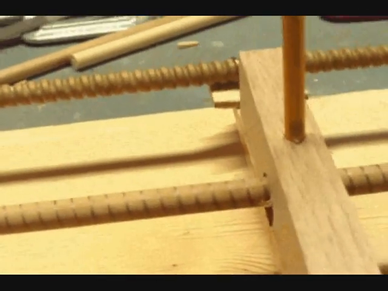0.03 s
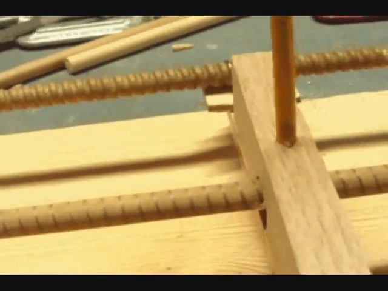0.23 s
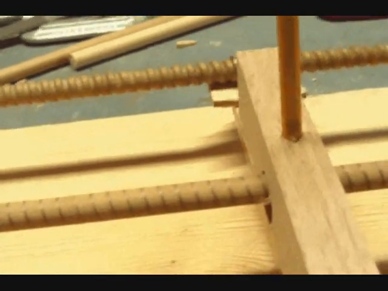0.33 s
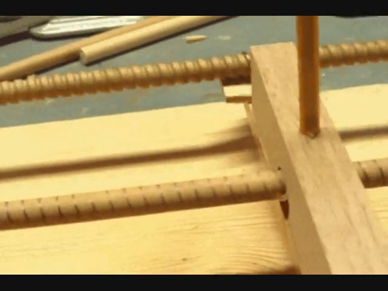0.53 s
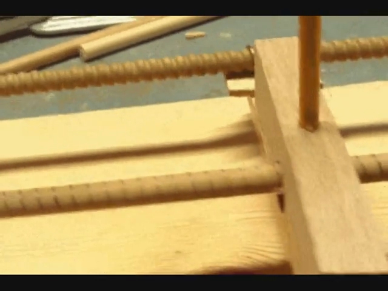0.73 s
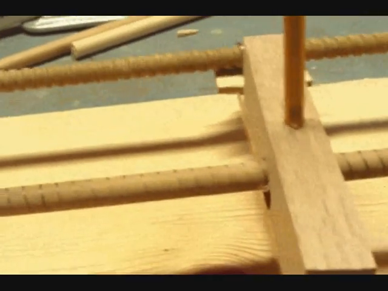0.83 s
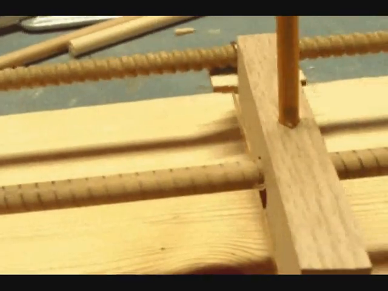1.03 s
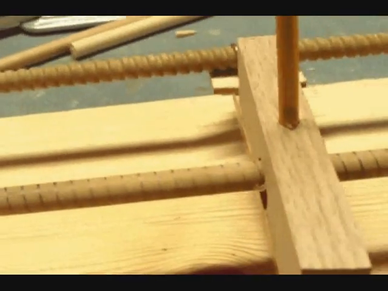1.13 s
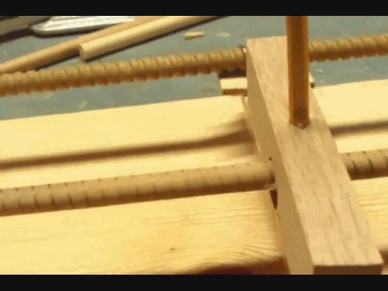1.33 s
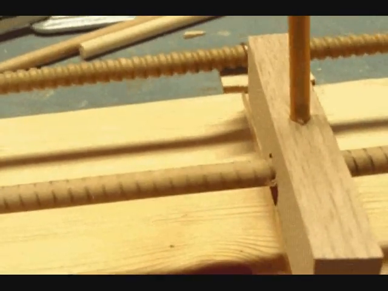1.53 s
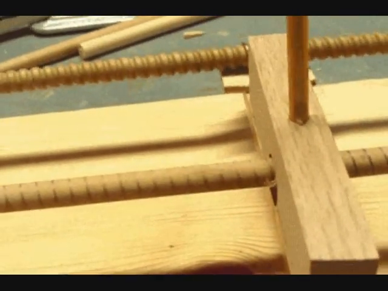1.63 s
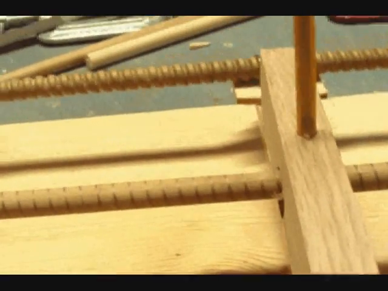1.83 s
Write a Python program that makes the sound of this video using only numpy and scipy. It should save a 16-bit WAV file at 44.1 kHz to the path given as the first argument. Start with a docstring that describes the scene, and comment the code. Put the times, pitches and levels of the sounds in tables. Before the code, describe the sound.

Dry, stuttering creaks come from a turning wooden screw, with rubbing and small thumps. After a short rest, a click starts a softer run of creaks. The room is small and quiet, with a low hum.

```python
"""A hand-cranked wooden lead screw drags a wooden carriage along its bed in a quiet workshop.
The dry thread sticks and slips: each slip is a short hollow judder that rings the frame, thumps the
bench and scrapes. Between slips the thread rubs. The crank rests for a moment, takes up its play
with a click and turns on more gently. Underneath: bench rumble, room air and a low hum."""
import sys
import numpy as np
from scipy import signal
from scipy.fft import rfft, irfft
from scipy.io import wavfile

SR = 44100
rng = np.random.default_rng(int(sys.argv[2]) if len(sys.argv) > 2 else 0)


def to_wav(s):
    """Save 16-bit WAV."""
    ch = np.atleast_2d(s).T  # columns
    pcm = np.round(np.clip(ch, -1, 1) * 32767)  # PCM
    wavfile.write(sys.argv[1], SR, pcm.astype(np.int16))


N = 83790
T = np.arange(N) / SR


def from_db(db):
    return 10 ** (np.asarray(db) / 20)


def unit_rms(x):
    return x / np.sqrt(np.mean(x ** 2) + 1e-20)


def level(points):
    """Gain over time from (s, dB) points."""
    return from_db(np.interp(T, *np.transpose(points)))


def coloured(x, spectrum):
    """Shape x by (Hz, dB) points; rms 1."""
    hz, db = np.transpose(spectrum)
    bins_hz = np.maximum(np.fft.rfftfreq(N, 1 / SR), 1)
    gain = from_db(np.interp(np.log(bins_hz), np.log(hz), db))
    return unit_rms(irfft(rfft(x) * gain, N))


def wobble(cutoff_hz):
    """Smooth random unsteadiness; rms 1."""
    lowpass = signal.butter(2, cutoff_hz, fs=SR, output="sos")
    return unit_rms(signal.sosfilt(lowpass, rng.standard_normal(N)))


def swell(attack_s, t60_s):
    """Quick rise, exponential decay."""
    t = T[:SR // 4]
    return (1 - np.exp(-t / attack_s)) * np.exp(-np.log(1000) * t / t60_s)


def strike(modes, attack_s):
    """One blow on (Hz, dB, t60 s) modes, each slightly varied in level and pitch."""
    spread_db, detune = 1.4, 0.012
    out = 0
    for hz, db, t60_s in modes:
        louder, higher = rng.standard_normal(2)
        envelope = from_db(db + spread_db * louder) * swell(attack_s, t60_s)
        out = out + envelope * np.sin(2 * np.pi * hz * (1 + detune * higher) * T[:len(envelope)])
    return out


def add(track, start_s, sound):
    i = int(np.clip(start_s * SR, 0, N - 1))
    track[i:i + len(sound)] += sound[:N - i]


def background():
    """Deep rumble of the rocking bench, room air and a low hum."""
    # Each row: time in seconds, level in dB.
    rumble_levels = [(0, -31), (.2, -46.5), (.34, -28), (.55, -46), (.76, -26.5), (.95, -37.5), (1.4, -39),
                     (1.5, -29.5), (1.62, -33.5), (1.9, -31.5)]
    # Each row: frequency in Hz, relative density in dB.
    rumble_spectrum = [(12, -6), (26, 0), (45, -4), (70, -10.5), (120, -7), (300, -56.5)]
    air_spectrum = [(20, -2), (60, -7.5), (125, -4), (180, -11), (270, -10), (450, -16.5), (1000, -20),
                    (2500, -25), (5000, -31.5), (6000, -41), (7000, -55)]
    # Each row: frequency in Hz, rms level in dB.
    hum_tones = [(54, -38), (119, -50)]
    air_db = -38
    rumble = level(rumble_levels) * coloured(rng.standard_normal(N), rumble_spectrum)
    hum = sum(from_db(db) * np.sqrt(2) * np.sin(2 * np.pi * (hz * T + rng.random()))
              for hz, db in hum_tones)
    air = from_db(air_db) * coloured(rng.standard_normal(N), air_spectrum)
    return rumble + hum + air


def fibre_grains():
    """Dense micro-slips of wood fibres, uneven in size."""
    rate_per_s, spread_db = 4000, 1.8
    sizes = from_db(spread_db * np.minimum(rng.exponential(1, N), 4))
    signs = rng.choice([-1, 1], N)
    return sizes * signs * (rng.random(N) < rate_per_s / SR)


def thread_rubbing():
    """The turning thread rubs unevenly in the carriage."""
    # Each row: time in seconds, level in dB.
    rub_levels = [(0, -48.5), (.18, -47.5), (.21, -26), (.265, -39), (.31, -28), (.345, -34.5), (.41, -41),
                  (.48, -27), (.565, -31), (.64, -25), (.715, -29), (.85, -31.5), (.92, -49.5), (1.35, -56),
                  (1.375, -35.5), (1.55, -32), (1.79, -34.5), (1.9, -34.5)]
    # Each row: frequency in Hz, relative density in dB.
    rub_spectrum = [(70, -7.5), (120, 0.5), (220, 5.5), (350, 5.5), (480, 3.5), (570, 5.5), (720, -2.5),
                    (1000, -7.5), (1400, -10), (1800, -13), (2600, -15.5), (3500, -19), (4500, -23.5),
                    (5800, -28.5), (7000, -52)]
    flutter_db = 1.5
    flutter = from_db(flutter_db * wobble(cutoff_hz=88))
    return level(rub_levels) * flutter * coloured(fibre_grains(), rub_spectrum)


def judder(hz, length_s):
    """The screw's vibration builds while it slides and is choked when it grips."""
    rise_s, grip_abruptness = 0.002, 2.1
    t = T[:SR // 10]
    build = 1 - np.exp(-(t / rise_s) ** 2)
    choke = np.exp(-(t / length_s) ** grip_abruptness)
    return build * choke * np.sin(2 * np.pi * hz * t)


def thread_slips():
    """Each slip judders, rings the frame, thumps the bench and scrapes briefly."""
    # Each row: start in seconds, judder level in dB, pitch in Hz, length in seconds,
    # thump level in dB, scrape level in dB.
    slips = [(0.051, -27, 664, 0.0057, -31.5, -46), (.195, -11, 590, 0.0039, -34, -46),
             (0.202, -31.5, 611, 0.0063, -29, -19.5), (0.2084, -5, 615, 0.0068, -11, -25),
             (0.217, -32.5, 573, 0.01, -41, -28.5), (0.227, -20.5, 577, 0.0077, -11, -29),
             (0.285, -24, 552, 0.012, -25.5, -31), (.301, -23, 630, .005, -27, -29),
             (.309, -20, 580, 0.0053, -15.5, -27), (0.362, -28, 568, 0.015, -17.5, -47),
             (.4185, -25, 502, 0.0029, -19, -31.5), (0.444, -15.5, 540, 0.026, -12, -18),
             (0.465, -8.5, 553, 0.012, -24.5, -16), (.478, -11.5, 582, 0.01, -14.5, -14.5),
             (.486, -4, 602, 0.0076, -12.5, -22), (.498, -6.5, 569, 0.0082, -11.5, -18),
             (.528, -9.5, 467, 0.0026, -18.5, -30), (.536, -12, 573, .021, -15, -45.5),
             (.5915, -1.5, 528, 0.0064, -39.5, -12.5), (.5995, -4.5, 607, 0.01, -29.5, -13),
             (.613, -12, 571, 0.0092, -32.5, -37), (.6345, -3, 515.5, 0.0079, -14.5, -22),
             (.6418, -0.5, 588, 0.01, -28.5, -10), (0.67, -23.5, 544, .010, -42, -26.5),
             (.686, -14.5, 544, 0.0058, -28, -18.5), (0.695, -12, 552, 0.014, -21, -28.5),
             (.733, -11.5, 554.7, 0.024, -12, -27), (.747, -13, 585, .009, -25, -18),
             (.761, -12, 560, 0.013, -26, -23.5), (0.777, -12, 518, 0.016, -12, -39),
             (0.804, -14.5, 584, 0.0044, -17, -41), (0.827, -12, 570, 0.012, -24.5, -19.5),
             (0.846, -15.5, 552, 0.014, -19, -32.5), (0.858, -36, 547, .010, -14.5, -24.5),
             (1.229, -43, 564, 0.0071, -32, -39), (1.352, -21.5, 507, 0.0068, -45, -31.5),
             (1.363, -18.5, 548, 0.017, -21, -31), (1.406, -23, 565, 0.0055, -36.5, -42),
             (1.431, -25, 547, 0.01, -36, -35), (1.46, -19.5, 540, 0.011, -45, -27.5),
             (1.493, -15, 513, 0.012, -17, -30.5), (1.559, -9, 584, 0.004, -17, -38),
             (1.591, -15.5, 547, 0.014, -30.5, -39), (1.611, -22.5, 546, 0.011, -33, -37.5),
             (1.662, -24.5, 613, 0.017, -37, -33), (1.682, -15.5, 484, 0.009, -33, -32),
             (1.721, -28, 534, 0.0032, -44, -27.5), (1.786, -22.5, 518, 0.0063, -28, -39),
             (1.825, -36, 645, .007, -23.5, -26.5), (1.839, -19, 533, 0.0062, -23, -29.5),
             (1.863, -23.5, 542, 0.012, -20, -35), (1.881, -22, 528, .007, -39, -29)]
    # Each row: frequency in Hz, dB re judder (frame) or thump (bench), t60 in seconds.
    frame_modes = [(317.6, -20.5, 0.019), (414, -7.5, 0.043), (580, -13.5, 0.076), (691, -15.5, 0.07),
                   (800, -17, 0.043), (953.4, -24, .05), (1003, -16.5, 0.053), (1261, -16.5, 0.051),
                   (1367, -19, 0.036)]
    bench_modes = [(61.4, -17.5, 0.23), (109, -5.5, 0.066), (136.3, 0, 0.046), (208, -2, 0.046),
                   (266.6, -8, .05)]
    # Each row: frequency in Hz, relative density in dB.
    scrape_spectrum = [(200, 7), (450, 9.5), (750, 2.5), (980, 5.5), (1130, -5.5), (1300, 1), (1750, -12.5),
                       (2300, -11), (2750, -16.5), (3400, -27), (4200, -16.5), (5500, -29), (7000, -61)]
    screw, body, scrape_power = np.zeros((3, N))
    for start_s, judder_db, hz, length_s, thump_db, scrape_db in slips:
        add(screw, start_s, from_db(judder_db) * judder(hz, length_s))
        add(body, start_s, from_db(judder_db) * strike(frame_modes, attack_s=0.00063))
        add(body, start_s, from_db(thump_db) * strike(bench_modes, attack_s=0.0028))
        add(scrape_power, start_s, (from_db(scrape_db) * swell(attack_s=0.0016, t60_s=0.098)) ** 2)
    roughness = 1 + 0.17 * wobble(cutoff_hz=200)
    scrape = np.sqrt(scrape_power) * coloured(fibre_grains(), scrape_spectrum)
    return screw * roughness + body + scrape


def bearing_clicks():
    """The screw takes up its play and taps its bearing: a dry crack and a brief ring."""
    # Each row: start in seconds, crack level in dB, ring level in dB.
    clicks = [(.1940, -21.5, -26.5), (.4195, -37.5, -34), (0.592, -27, -29), (0.6429, -16.5, -31),
              (1.3642, -23.5, -21), (1.3663, -29, -21.5), (1.46, -38, -47), (1.561, -41, -50),
              (1.725, -34, -48)]
    # Each row: frequency in Hz, relative level in dB, t60 in seconds.
    ring_modes = [(1780, -14.5, 0.02), (2420, -2, 0.031), (2327, -15, 0.2), (2630, -16, .1),
                  (3480, -6.5, 0.012), (4050, -17, 0.018), (4600, -19, 0.0077)]
    # Each row: frequency in Hz, relative density in dB.
    crack_spectrum = [(600, -4), (1300, 3), (1850, 3), (2500, -4.5), (3400, -7), (4250, -0.5), (4900, -9),
                      (6000, -9.5), (7000, -24.5)]
    ring, crack_envelope = np.zeros((2, N))
    for start_s, crack_db, ring_db in clicks:
        add(ring, start_s, from_db(ring_db) * strike(ring_modes, attack_s=0.00025))
        add(crack_envelope, start_s, from_db(crack_db) * swell(attack_s=0.0009, t60_s=0.026))
    return ring + crack_envelope * coloured(rng.standard_normal(N), crack_spectrum)


def workshop_reverb(x):
    """Short diffuse room tail."""
    wet_db = -16
    envelope = swell(attack_s=0.0014, t60_s=0.26)
    tail = envelope * rng.standard_normal(len(envelope))
    return from_db(wet_db) * signal.fftconvolve(x, tail / np.linalg.norm(tail))[:N]


def scene():
    """The mechanism in its room; mono."""
    ambience = background()
    mechanism = thread_rubbing() + bearing_clicks() + thread_slips()
    return (mechanism + workshop_reverb(mechanism) + ambience)[None]


def record(dry):
    """Narrow-band microphone, clipping on overload, then a final low-pass."""
    mic_low_hz, mic_top_hz, clip_level, stop_hz = 7.2, 7480, 0.97, 11500
    heard = signal.sosfilt(signal.butter(1, mic_low_hz, "high", fs=SR, output="sos"), dry)
    heard = signal.sosfilt(signal.cheby2(16, 55, mic_top_hz, fs=SR, output="sos"), heard)
    heard = np.clip(heard, -clip_level, clip_level)
    return signal.sosfilt(signal.cheby2(16, 60, stop_hz, fs=SR, output="sos"), heard)


dry = scene()
out = record(dry)
to_wav(out)
```